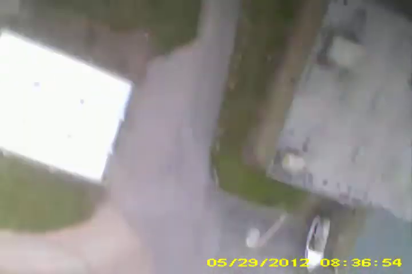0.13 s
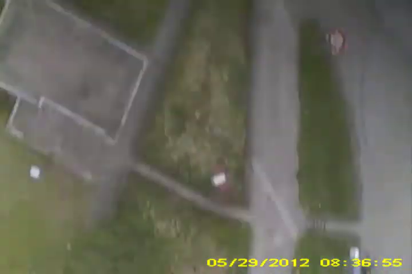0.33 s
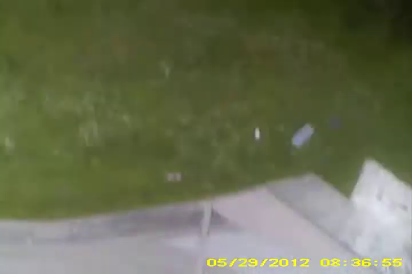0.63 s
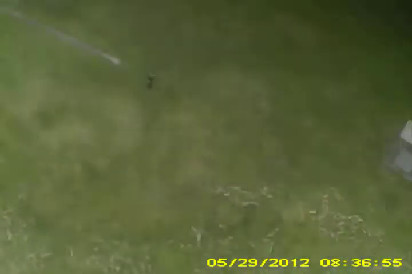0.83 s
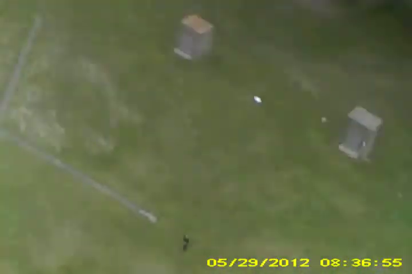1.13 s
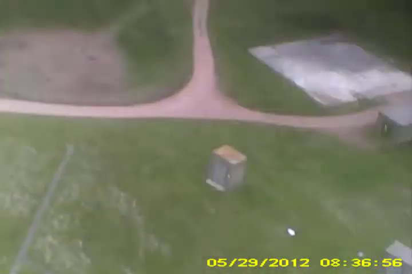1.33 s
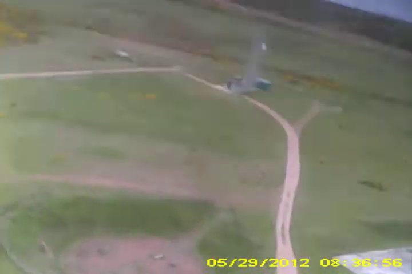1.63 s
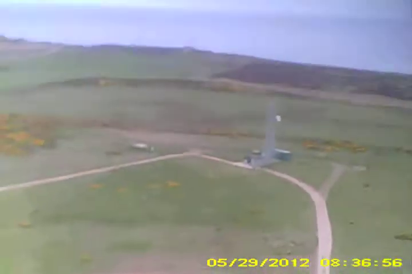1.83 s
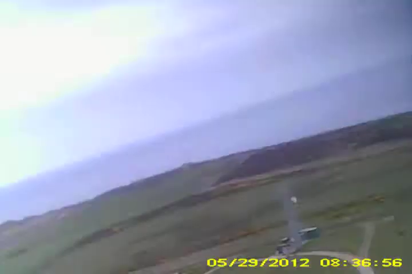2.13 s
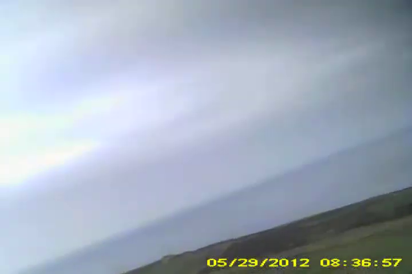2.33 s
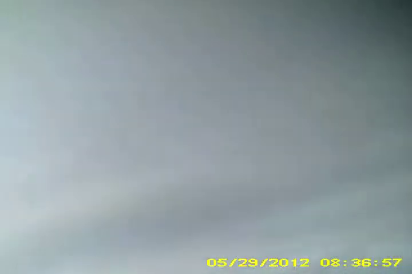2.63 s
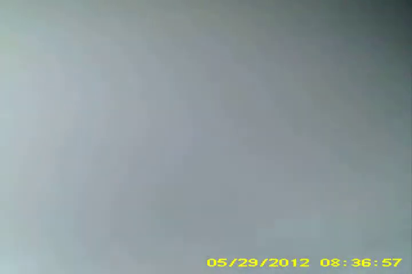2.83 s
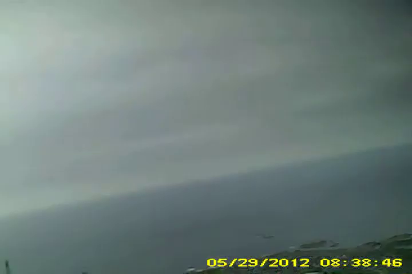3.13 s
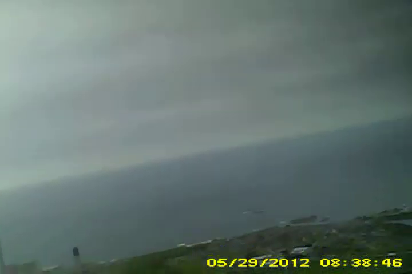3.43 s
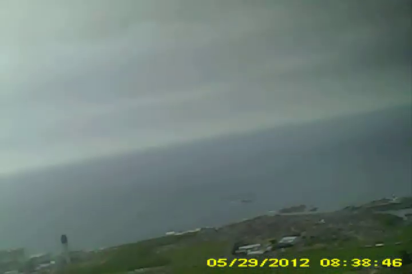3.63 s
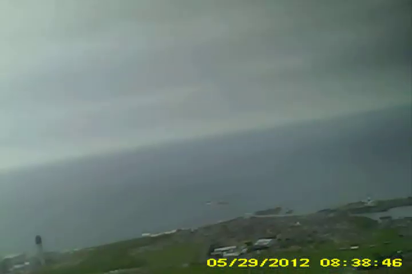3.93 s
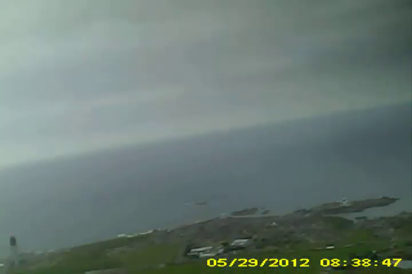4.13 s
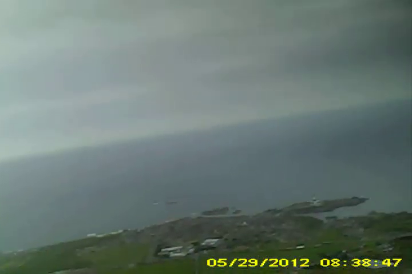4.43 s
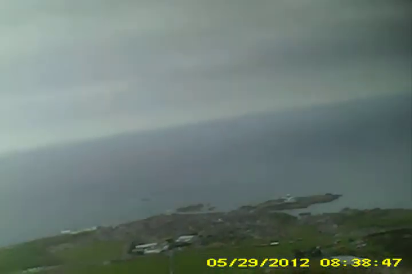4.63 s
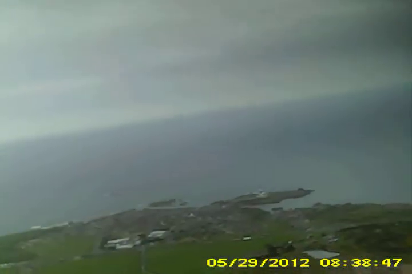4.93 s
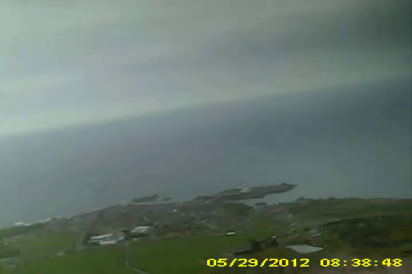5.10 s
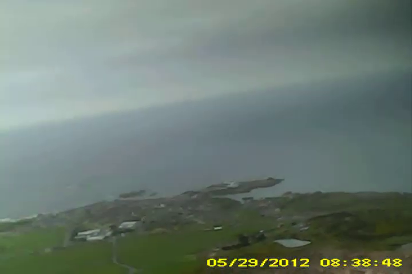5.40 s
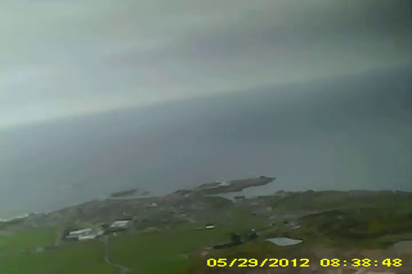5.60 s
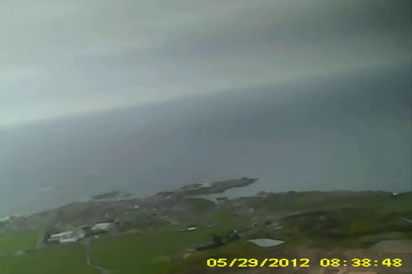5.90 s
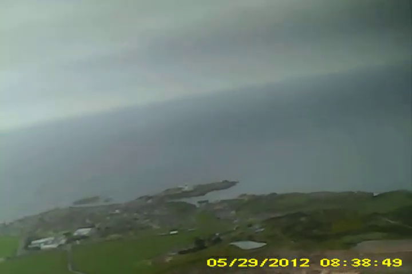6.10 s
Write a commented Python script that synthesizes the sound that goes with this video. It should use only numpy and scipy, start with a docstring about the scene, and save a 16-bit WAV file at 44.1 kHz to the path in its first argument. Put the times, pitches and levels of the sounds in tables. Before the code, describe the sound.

Dull, overdriven wind noise on a camera in flight, with faint ticks, two soft thumps and a thin, high rattle later on.

```python
"""Wind rushes over the bare microphone of a small camera in flight. First a fast low pass overdrives
the capsule. At 3.15 s, a cut to a calmer glide: two gusts thump the port, then a loose part rattles
thinly in the airflow. Throughout, the cavity behind the port howls, the level drops briefly at times
and shaved crests tick faintly. The camera's 8 kHz sampling dulls the sound."""
import sys
import numpy as np
from scipy import signal
from scipy.fft import irfft
from scipy.io import wavfile
from scipy.ndimage import uniform_filter1d

SR = 44100
rng = np.random.default_rng(int(sys.argv[2]) if len(sys.argv) > 2 else 0)


def store_wav(level_fs):
    """Save 16-bit WAV to argv[1]."""
    pcm = np.round(np.clip(np.atleast_2d(level_fs), -1, 1) * 32767)
    wavfile.write(sys.argv[1], SR, pcm.T.astype(np.int16))


N = 276066

# wind spectra: (frequency [Hz], relative density [dB])
PASS_SPECTRUM = [(15, -52), (25, -16.5), (85, -23), (122, -10.5), (182, -11), (216, -4.5), (433, 0.5),
                 (620, -0.5), (675, -0.5), (1120, 0), (2350, -5), (3580, -12), (3900, -11.5), (5070, -42.5),
                 (8580, -120)]
GLIDE_SPECTRUM = [(15, -62.5), (25, -40), (65, -32), (105, -23), (157, -6.5), (211, -8.5), (343, -4),
                  (415, -5.5), (595, 0), (927, -6.5), (1010, -4), (1270, -8), (1600, -6.5), (1850, -10.5),
                  (2160, -9), (2780, -18), (3360, -20), (3900, -25.5), (5070, -54), (8580, -120)]
# wind envelopes: (time [s], buffeting [dB], relative hiss [dB], howl boost [dB])
PASS_ENVELOPE = [(0.0, -16, -3, -2.5), (0.7, -16, -1.4, 1), (1.2, -15.5, 0, -3), (1.75, -16, 1.3, 4),
                 (2.0, -16, 0.5, 3.5), (2.4, -15.3, 0.5, 0.5), (2.8, -16, -0.6, 0), (3.15, -17.5, 0, 1)]
GLIDE_ENVELOPE = [(3.152, -19.5, -0.5, -1), (3.3, -18, -1, 1), (3.6, -17, -3.5, -1), (3.97, -18, -2.5, 0),
                  (4.1, -15.5, -2.5, 2), (4.2, -16.5, -2.5, -2), (4.6, -17, -2.5, -0.5),
                  (4.8, -17, -1.5, 2), (5.05, -15.5, -4, 1.5), (5.22, -17, -3.5, -0.5), (5.4, -18, -4, 1.5),
                  (5.67, -16.5, -2.5, 0), (5.82, -18.5, -2.5, -0.5), (6.08, -16, -2.5, 2.5),
                  (6.26, -18, -1.5, -2.5)]
# turbulence, pass then glide: (drive [dB], patchiness [dB], gust flicker [dB], flutter [dB])
TURBULENCE = [(1.5, 0.14, 0.72, 0.6), (0.43, 1.01, 0.98, 1.54)]
# hardest knocks of the loose part: (time [s], level [dB])
HARD_KNOCKS = [(3.681, -16.5), (3.7243, -17), (3.7461, -17), (3.775, -15), (3.869, -13.5), (3.947, -16),
               (4.1627, -18), (4.2428, -15), (4.341, -16.5), (4.3578, -15), (4.4417, -15), (4.564, -13),
               (4.588, -14), (4.6543, -17), (4.6765, -17.5), (4.7144, -14), (4.787, -13.5), (4.8002, -12.5),
               (4.8882, -18.5), (5.59, -20), (5.671, -18.5), (5.712, -16), (5.7344, -22), (5.8887, -18.5),
               (5.9627, -16.5), (6.0248, -15.5), (6.1734, -18), (6.2261, -16.5)]
# spells of lighter rattling: (start [s], end [s])
RATTLE_SPELLS = [(3.62, 4.04), (4.2, 4.9), (5.66, 6.04), (6.16, 6.25)]
# gusts hitting the port: (time [s], level [dB], frequency [Hz])
PORT_GUSTS = [(3.192, -15, 167), (3.284, -9, 250)]
# sudden level drops: (time [s], depth [dB], recovery [s])
LEVEL_DROPS = [(1.225, 5.5, 0.018), (1.827, 6, .011), (2.143, 3, .017), (2.41, 4, .013), (2.702, 4, 0.019),
               (2.939, 5, .012), (3.152, 9.5, 0.026), (3.302, 5, 0.012), (3.583, 4.5, .027),
               (4.168, 5, 0.036), (4.377, 6.5, .032), (4.946, 5.5, 0.037), (5.155, 4, 0.026),
               (5.24, 4, .04), (5.616, 2, 0.033), (6.159, 5, 0.022)]
# shaved crests: (time [s], treble peak [dB], width [ms])
SHAVED_CRESTS = [(0.1266, -48, .089), (0.1434, -34.5, .092), (0.4945, -31, 0.11), (0.6749, -37.5, .11),
                 (0.7532, -38, 0.1), (0.9373, -33.5, .08), (1.0909, -44, 0.081), (1.6573, -27, 0.091),
                 (1.701, -33, 0.091), (1.725, -30, .098), (1.7569, -42, .096), (1.9165, -25, .15),
                 (1.9659, -41, .079), (2.0924, -42, 0.081), (2.1735, -41, .12), (2.1957, -33, .19),
                 (2.383, -41, 0.07), (2.4902, -34, 0.095), (2.5118, -27.5, .053), (2.5795, -45, 0.088),
                 (2.7778, -33.5, .12), (2.8135, -32, 0.08), (3.0619, -43, .091), (3.2909, -30, .11),
                 (3.5768, -44, 0.085), (3.6704, -32, .097), (4.357, -29, .1), (4.7093, -34, .1),
                 (4.7745, -32, .1), (5.5563, -51, .12), (5.6072, -34, .091)]

HOWL_HZ, HOWL_WIDTH_OCT = 584, .25
THIN_HZ, THIN_WIDTH_OCT, THIN_DB_PER_DB = 190, .8, 1.1
LULL_START_S, LULL_END_S, LULL_ABOVE_HZ, LULL_DB = 6.075, 6.16, 2650, -10
PUSH_LIMIT, PULL_LIMIT, KNEE_POWER, BASS_CUT_HZ = .64, .73, 3., 45
RING_HZ, RING_RISE_S, RING_T60_S = 3396, .00025, .028
LIGHT_PER_S, LIGHT_DB, LIGHT_SPREAD_DB, SLOT_S = 22, -18.5, 4.5, .02
DULL_TICKS_PER_TICK, DULL_TICK_UNDER_DB, DULL_TICK_SPREAD_DB = 2, 23, 16.5
DULL_TICK_MS, DULL_TICK_BEFORE_S, DULL_TICK_AFTER_S = .33, .018, .012
UP, DOWN = 441, 80  # SR * DOWN / UP = 8 kHz
CLIP_LOW, CLIP_HIGH, DC_OFFSET = -.67, .58, -.0072
SMOOTH_HZ, SMOOTH_WIDTH_HZ, BAND_LIMIT_HZ = 4059, 232, 15800


def wind(envelope, spectrum, turbulence):
    """Noise at the capsule: eddies make spectral patches, gusts flicker through all bands at once."""
    times_s, buffet_db, hiss_db, howl_db = np.transpose(envelope)
    drive_db, patchy_db, flicker_db, flutter_db = turbulence
    frames, hz = N // 256 + 5, np.fft.rfftfreq(1024, 1 / SR)
    t = np.arange(frames) * 256 / SR
    real, imag, patches = rng.standard_normal((frames, 513, 3)).T
    patches = unit_rms(uniform_filter1d(uniform_filter1d(patches, size=12, axis=0), size=6, axis=1))
    flicker = unit_rms(uniform_filter1d(rng.standard_normal(frames), size=3))
    knots_hz, density_db = np.transpose(spectrum)
    shape = gain_of(np.interp(np.log(hz + 1), np.log(knots_hz + 1), density_db))
    treble = np.clip(np.log2((hz + 1) / 800) / 2.26, 0, 1.6)[:, None]  # higher hiss swings more
    thinning = THIN_DB_PER_DB * bell(hz, THIN_HZ, THIN_WIDTH_OCT)  # upper bass thins as hiss grows
    level_db = np.interp(t, times_s, buffet_db)
    level_db = level_db + (treble - thinning) * np.interp(t, times_s, hiss_db - hiss_db.mean())
    level_db += bell(hz, HOWL_HZ, HOWL_WIDTH_OCT) * np.interp(t, times_s, howl_db)  # port cavity
    level_db += LULL_DB * (hz > LULL_ABOVE_HZ)[:, None] * (t > LULL_START_S) * (t < LULL_END_S)
    swirl_db = patchy_db * patches + flicker_db * (.39 + treble) * flicker
    spectra = (real + 1j * imag) * shape[:, None] * gain_of(swirl_db)
    low_band_rms = np.sqrt(np.mean(np.sum(abs(spectra[hz < 1200]) ** 2, axis=0)))
    spectra *= gain_of(level_db + drive_db) / low_band_rms
    pressure = 2 * signal.istft(spectra, nperseg=1024, noverlap=768)[1][:N]
    flutter = unit_rms(uniform_filter1d(uniform_filter1d(rng.standard_normal(N), size=160), size=160))
    pressure *= gain_of(flutter_db * flutter)  # small eddies pass within milliseconds
    now_s = np.arange(N) / SR
    return capsule(pressure) * (now_s >= times_s[0]) * (now_s <= times_s[-1] + .002)


def capsule(pressure):
    """The capsule saturates softly, sooner on pressure than on suction."""
    limit = np.where(pressure > 0, PUSH_LIMIT, PULL_LIMIT)
    return pressure / (1 + abs(pressure / limit) ** KNEE_POWER) ** (1 / KNEE_POWER)


def drop_gain():
    """At each listed time the wind level falls at once and creeps back."""
    t, db = np.arange(N) / SR, np.zeros(N)
    for at_s, depth_db, recovery_s in LEVEL_DROPS:
        db -= (t >= at_s) * depth_db * np.exp(-(np.maximum(t - at_s, 0) / recovery_s) ** 2)
    return gain_of(db)


def rattle():
    """Each knock rings one short high mode of the loose part; light knocks fall at random in spells."""
    out, t = np.zeros(N), np.arange(2400) / SR
    slots_s = np.concatenate([np.arange(start_s, end_s, SLOT_S) for start_s, end_s in RATTLE_SPELLS])
    late, chance, size = rng.random((len(slots_s), 3)).T
    candidates = np.c_[slots_s + SLOT_S * late, LIGHT_DB + LIGHT_SPREAD_DB * (size - .5)]
    light_knocks = candidates[chance < SLOT_S * LIGHT_PER_S]
    draws = rng.random((len(HARD_KNOCKS) + len(slots_s), 2))
    for (at_s, db), (detune, phase) in zip([*HARD_KNOCKS, *light_knocks], draws):
        ring = (1 - np.exp(-t / RING_RISE_S)) * gain_of(db - 60 * t / RING_T60_S)
        hz = RING_HZ * (1 + .035 * (detune - .5))
        add(out, at_s, ring * np.sin(2 * np.pi * (hz * t + phase)))
    return out


def gust_thumps():
    """Blunt pushes of air on the port: two cycles under a smooth window."""
    out = np.zeros(N)
    for at_s, db, hz in PORT_GUSTS:
        cycles = np.arange(0, 2, hz / SR)
        add(out, at_s, gain_of(db) * np.sin(2 * np.pi * cycles) * np.sin(np.pi * cycles / 2) ** 2)
    return out


def ticks():
    """The cap cut off a crest is a small parabola; only its sharp corners rise above the wind."""
    out, t = np.zeros(N), np.arange(-200, 200) / SR
    treble_fir = signal.firwin(201, [5500, 15000], pass_zero=False, fs=SR)
    pulses = [(at_s, db, np.maximum(1 - (t * 2000 / ms) ** 2, 0)) for at_s, db, ms in SHAVED_CRESTS]
    # fast pass only: faint dull ticks scattered just before and after each sharp tick
    dull_pulse = np.exp(-10 * (t * 1000 / DULL_TICK_MS) ** 2)
    for at_s, db, _ in SHAVED_CRESTS:
        if at_s < GLIDE_ENVELOPE[0][0]:
            for when, size in rng.random((DULL_TICKS_PER_TICK, 2)):
                dull_s = at_s - DULL_TICK_BEFORE_S + (DULL_TICK_BEFORE_S + DULL_TICK_AFTER_S) * when
                dull_db = db - DULL_TICK_UNDER_DB + DULL_TICK_SPREAD_DB * (size - .5)
                pulses.append((dull_s, dull_db, dull_pulse))
    for at_s, db, pulse in pulses:
        treble_peak = abs(signal.hilbert(np.convolve(pulse, treble_fir, "same"))).max()
        add(out, at_s - .0032, gain_of(db) * pulse / treble_peak)
    return out


def gain_of(db):
    return 10 ** (np.asarray(db) / 20)


def unit_rms(x):
    return x / np.sqrt(np.mean(x ** 2) + 1e-20)


def bell(hz, centre_hz, width_oct):
    return np.exp(-(np.log2((hz + 1) / centre_hz) / width_oct) ** 2)[:, None]


def add(mix, at_s, sound):
    part = mix[max(round(at_s * SR), 0):][:len(sound)]
    part += sound[:len(part)]


def scene():
    """Wind, bass-cut by the coupling from capsule to converter, plus rattle and thumps. Mono."""
    fast_pass = wind(PASS_ENVELOPE, PASS_SPECTRUM, TURBULENCE[0])
    glide = wind(GLIDE_ENVELOPE, GLIDE_SPECTRUM, TURBULENCE[1])
    air = signal.lfilter(*signal.butter(1, BASS_CUT_HZ, "high", fs=SR), fast_pass + glide)
    return (air * drop_gain() + rattle() + gust_thumps())[None]


def record(dry):
    """8 kHz sampling, hard clip, smoothing that leaves a mirror image above 4 kHz, ticks, band limit."""
    padded = np.pad(dry[0], (0, -N % UP + UP))
    sampled = np.clip(signal.resample(padded, len(padded) * DOWN // UP), CLIP_LOW, CLIP_HIGH)
    hz = np.fft.rfftfreq(len(padded), 1 / SR)
    # the spectrum repeats, mirrored, around the sampling rate
    images = np.fft.fft(sampled - sampled.mean())[np.arange(len(hz)) % len(sampled)]
    past_edge = np.minimum((hz - SMOOTH_HZ) / SMOOTH_WIDTH_HZ, 9)
    smoothing = gain_of(-6 * np.log2(1 + np.exp(2 * past_edge)) ** 1.035)
    played = irfft(images * smoothing, len(padded))[:N] * UP / DOWN + DC_OFFSET + ticks()
    band_limit = signal.firwin(511, BAND_LIMIT_HZ, window=("kaiser", 9), fs=SR)
    return signal.oaconvolve(played, band_limit, "same")[None]


dry = scene()
out = record(dry)
store_wav(out)
```